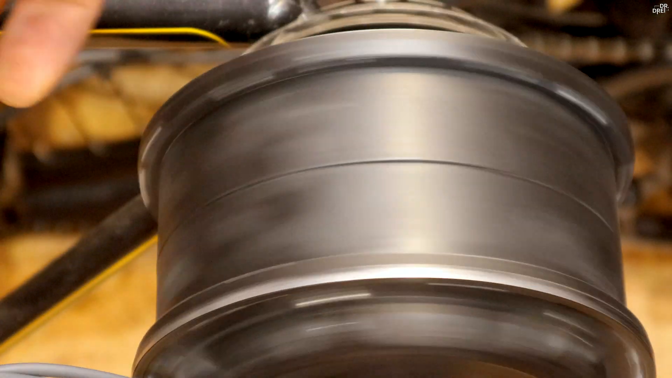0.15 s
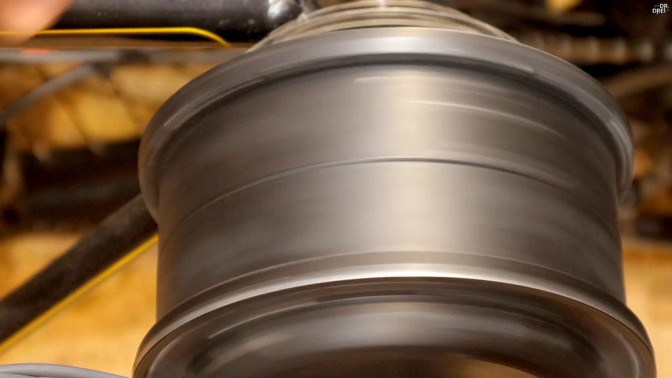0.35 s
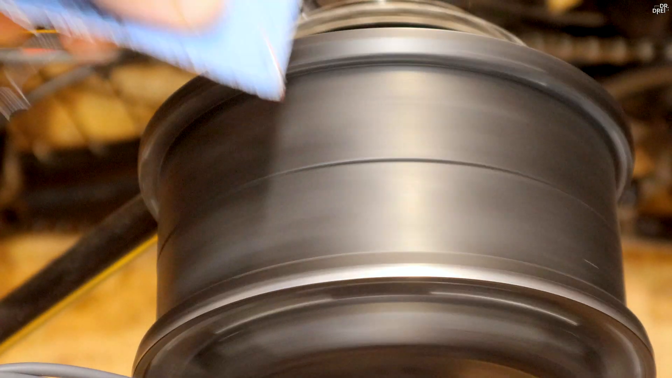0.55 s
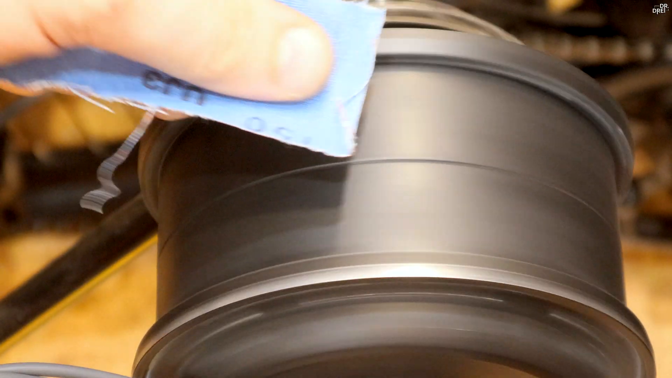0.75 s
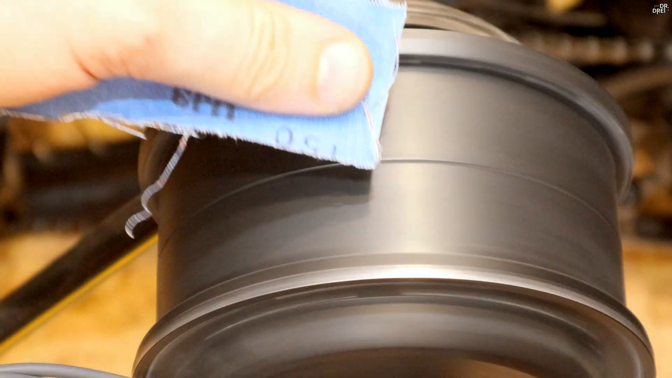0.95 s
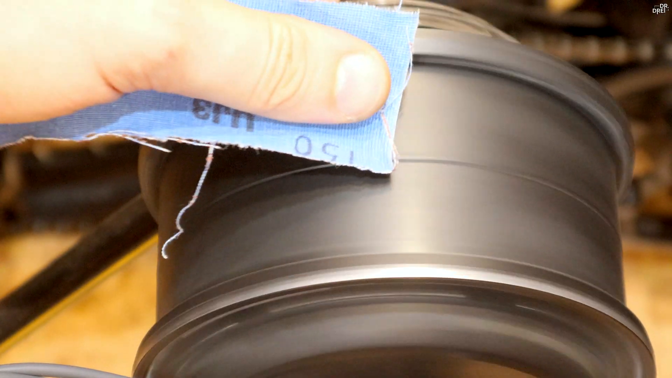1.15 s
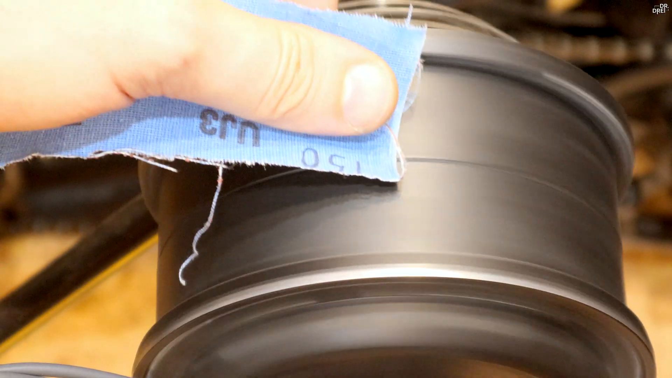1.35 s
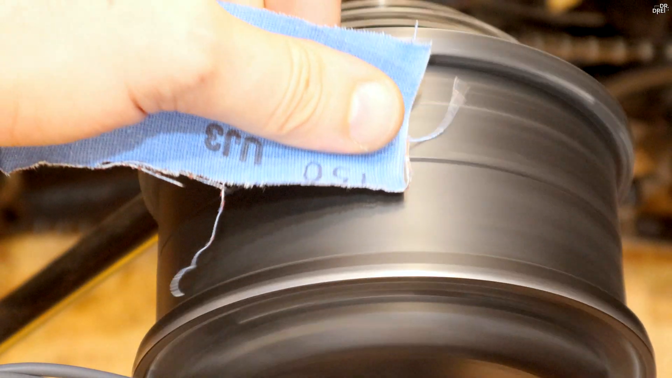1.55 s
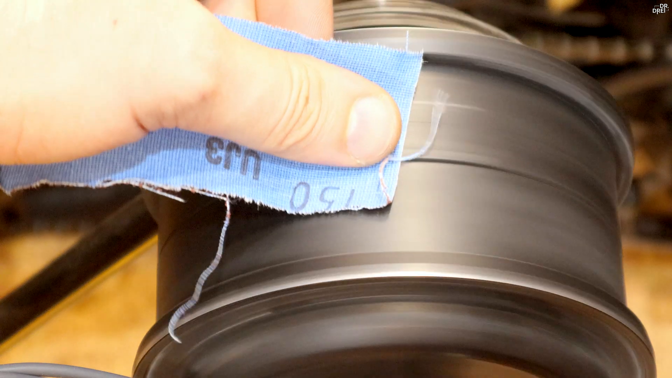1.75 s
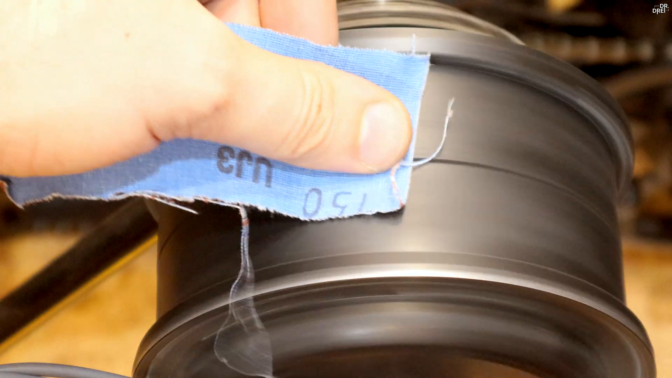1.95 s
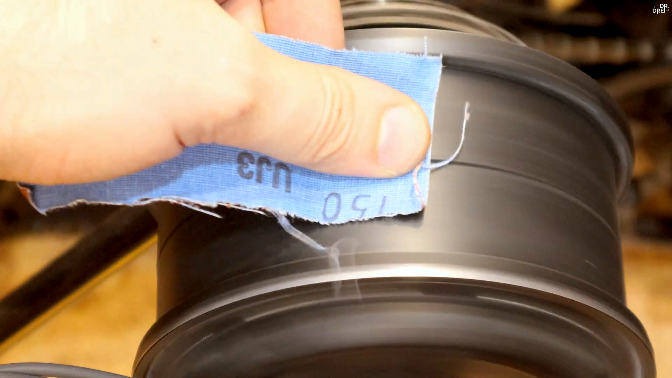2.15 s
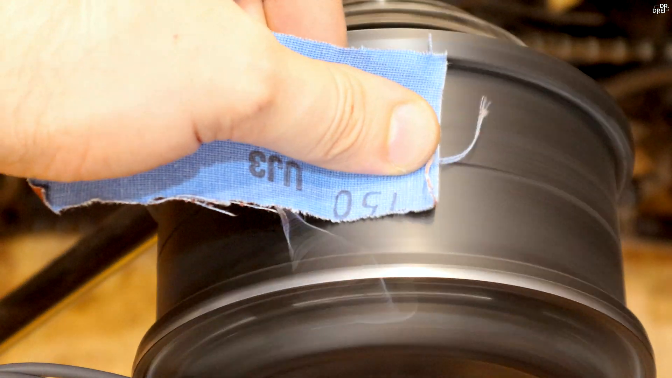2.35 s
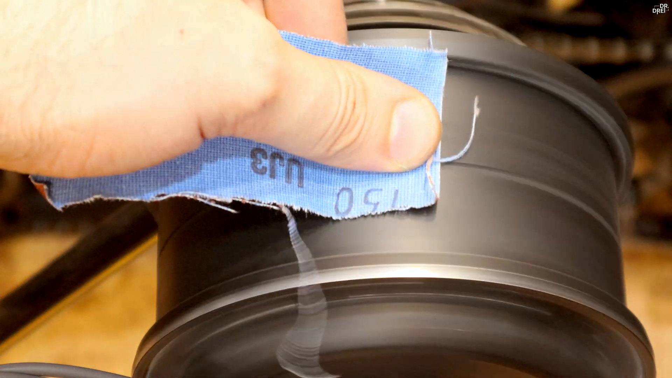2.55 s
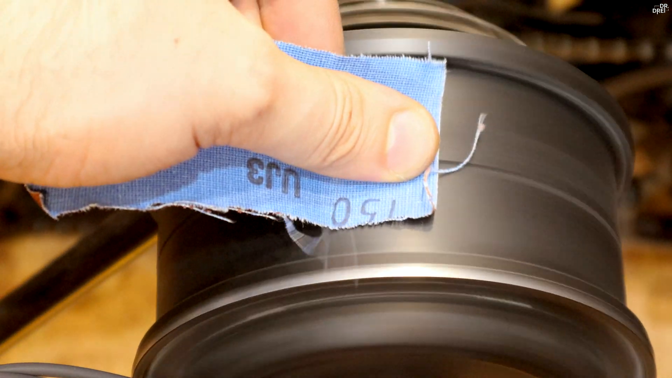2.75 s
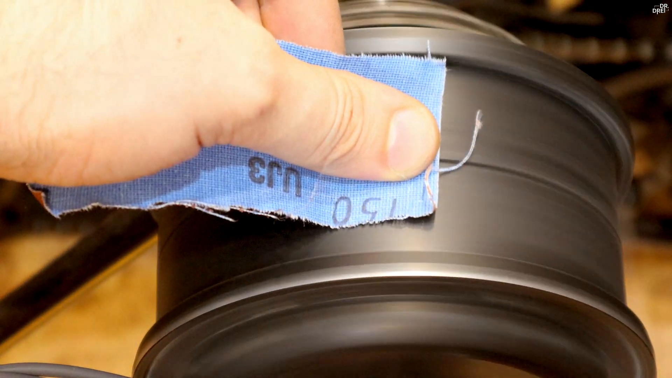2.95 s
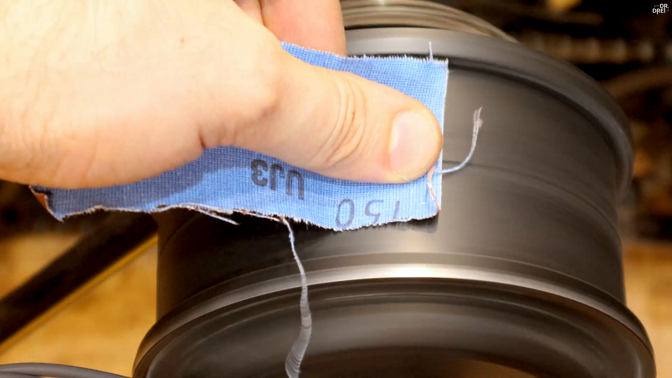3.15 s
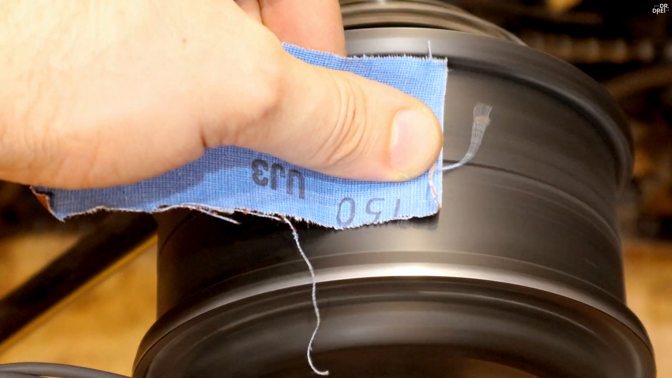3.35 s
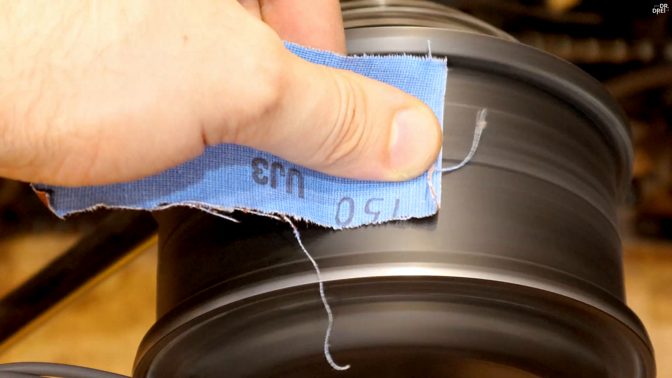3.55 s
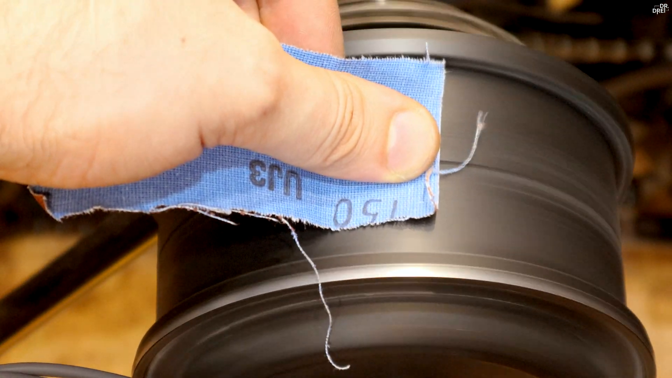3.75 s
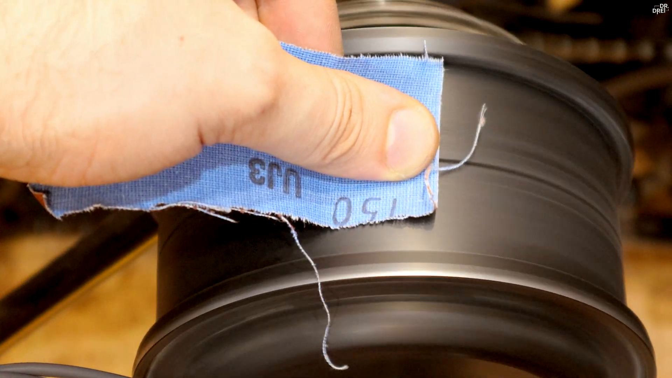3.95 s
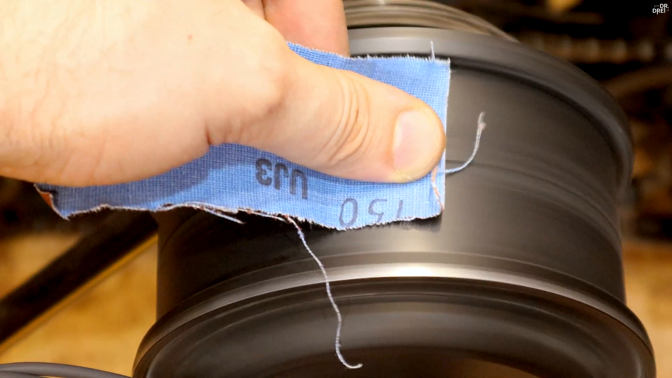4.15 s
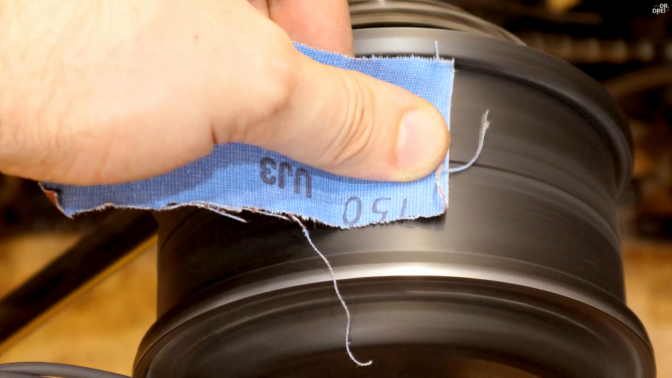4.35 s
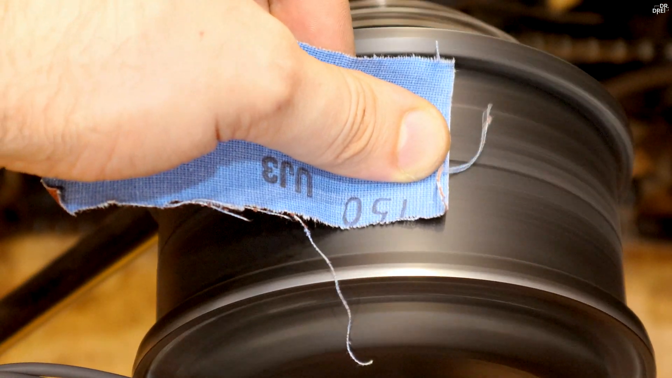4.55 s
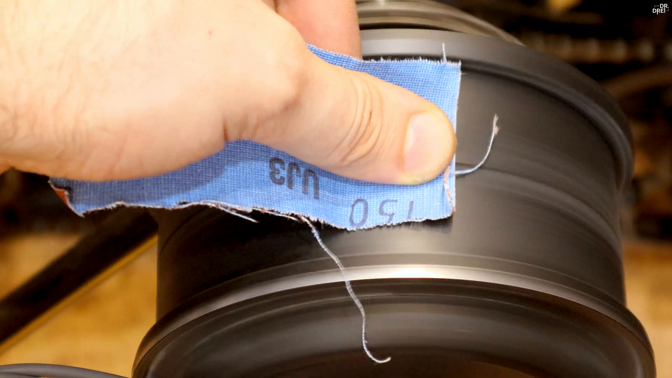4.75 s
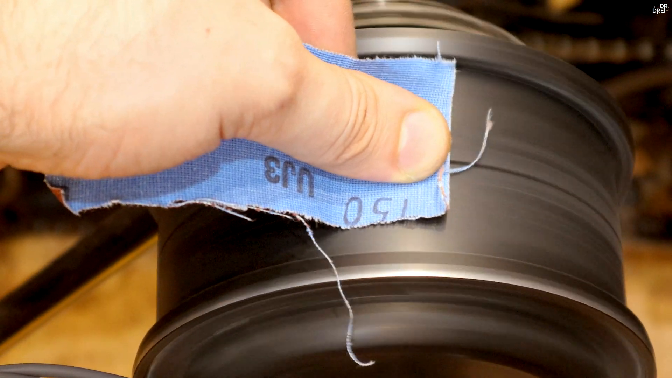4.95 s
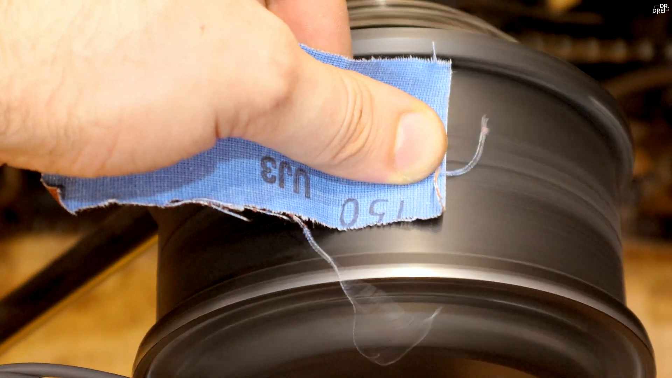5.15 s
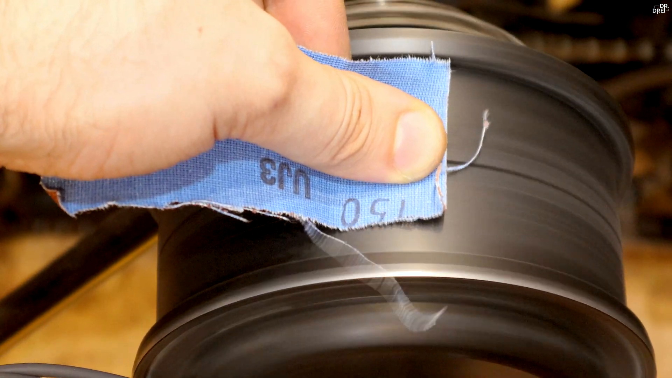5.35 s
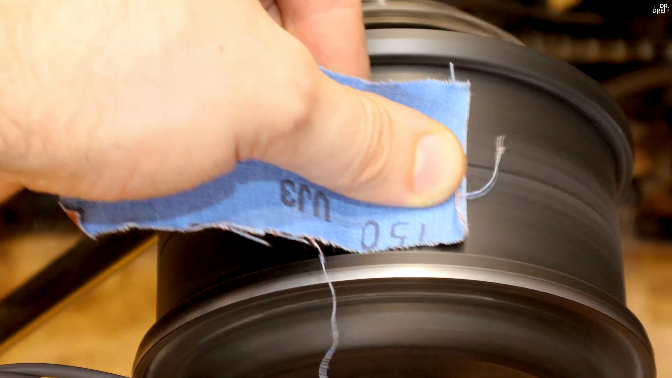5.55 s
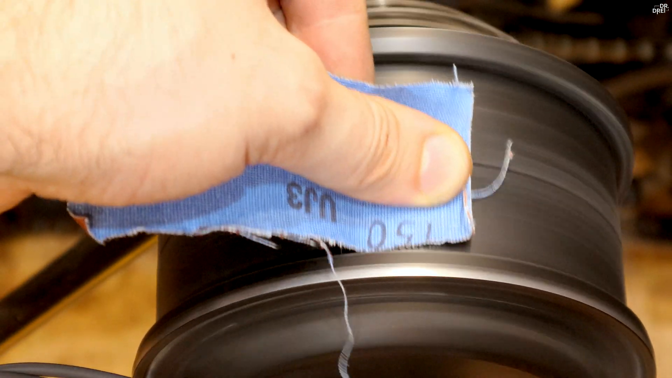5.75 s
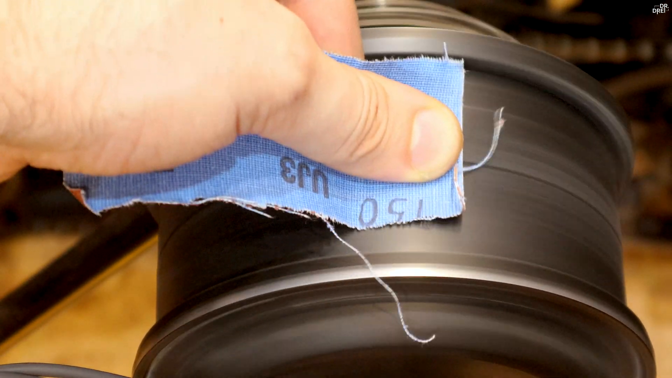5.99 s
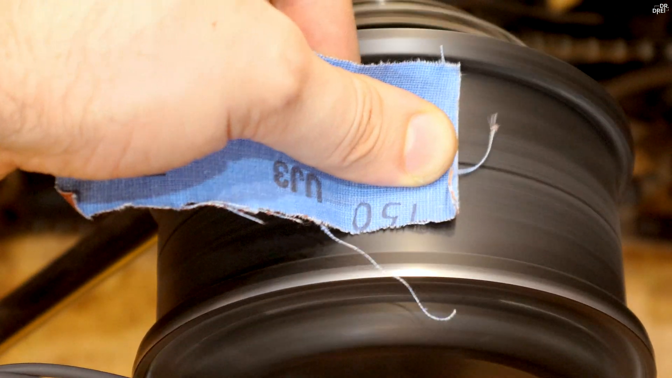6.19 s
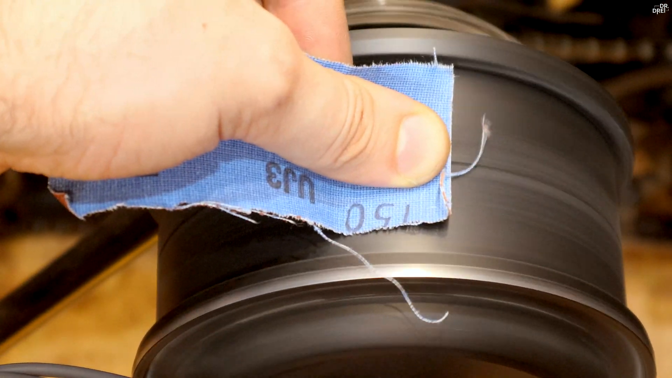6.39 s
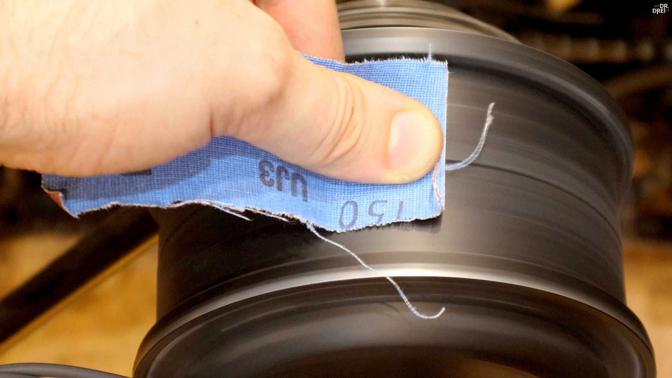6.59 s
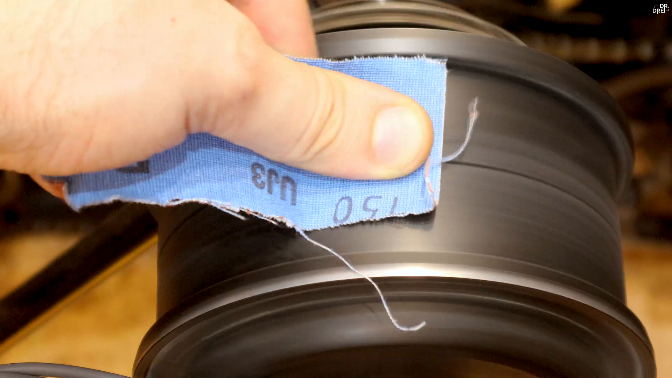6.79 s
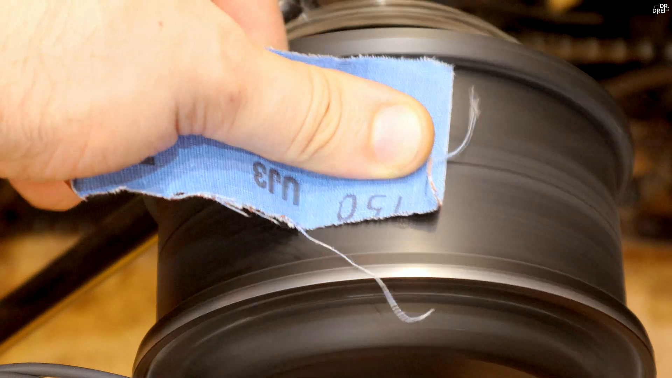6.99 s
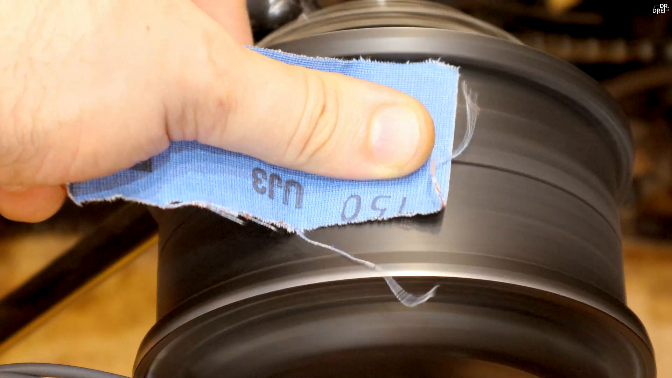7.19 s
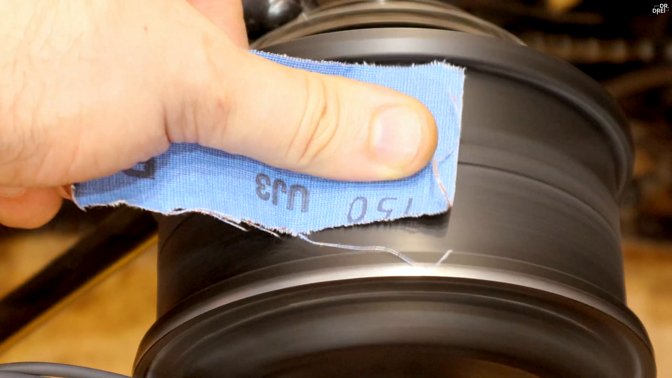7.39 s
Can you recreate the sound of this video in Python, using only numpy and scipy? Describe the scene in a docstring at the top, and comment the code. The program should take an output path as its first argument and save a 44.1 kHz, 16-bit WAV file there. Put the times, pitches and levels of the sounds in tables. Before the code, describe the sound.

A motor hums and knocks softly as it turns, then abrasive cloth presses on its metal shell in a loud, bright, pulsing hiss.

```python
"""On a workshop bench a hub motor turns, its speed rising in steps, and emery cloth is pressed on its metal shell.
Grit hiss is random excitation filtered by shell resonances and modulated by the same rough spots every turn.
The unbalanced rotor is a periodic impulse source: it knocks once a turn and rumbles in the modes of its mount.
Magnet hum, bearing whirr, grain snaps, a brief stick-slip squeal and soft bench bumps join in, over room hush."""
import sys
import numpy as np
from scipy import signal
from scipy.fft import rfft, irfft
from scipy.io import wavfile
from scipy.ndimage import uniform_filter1d

SR = 44100
rng = np.random.default_rng(int(sys.argv[2]) if len(sys.argv) > 2 else 0)


def log_audio(samples):
    """Write samples as a 16-bit WAV file to the path given in sys.argv[1]."""
    # one column per channel
    frames = np.atleast_2d(samples).T
    # limit to full scale, then quantise
    limited = np.clip(frames, -1, 1)
    pcm = np.round(limited * 32767).astype(np.int16)
    wavfile.write(sys.argv[1], SR, pcm)


N = 327222
T = np.arange(N) / SR   # s


def amp(db):
    """Level law: decibels to amplitude ratio."""
    return 10 ** (np.asarray(db) / 20)


def rms_one(x):
    """Normalisation to unit effective value."""
    return x / np.sqrt(np.mean(x ** 2) + 1e-20)


def in_time(rows):
    """Linear interpolation of a table's columns in time."""
    s, *columns = np.transpose(rows)
    return [np.interp(T, s, c) for c in columns]


def bump(s, length):
    """Gaussian envelope, length being its standard deviation."""
    return np.exp(-.5 * ((T - s) / length) ** 2)


def drift(rate):
    """Low-pass random process: noise through a double pole at rate Hz, spread 1."""
    r = np.exp(-2 * np.pi * rate / SR)
    wander = signal.lfilter([1], [1, -2 * r, r * r], rng.standard_normal(N + SR))
    return rms_one(wander[SR:])   # the first second settles the filter


def band_pass(x, order, edges):
    """Butterworth band limitation between two edges in Hz."""
    return signal.sosfilt(signal.butter(order, edges, "band", fs=SR, output="sos"), x)


def colour(x, spectrum, peaks=(), ripple_db=0):
    """Minimum-phase filtering: a spectrum, its resonant rises and a fine ripple of many small modes."""
    hz = np.maximum(np.arange(4097) * SR / 8192, 1)
    spectrum_hz, spectrum_db = np.transpose(spectrum)
    db = np.interp(np.log(hz), np.log(spectrum_hz), spectrum_db)
    for centre, width, rise in peaks:
        db = db + rise / (1 + (2 * (hz - centre) / width) ** 2)
    ripple = rms_one(uniform_filter1d(rng.standard_normal(4097), size=5))
    db = db + ripple_db * np.sqrt(4000 / (hz + 1000)) * ripple
    cepstrum = irfft(db * np.log(10) / 20)
    cepstrum[1:4096] *= 2   # folding the cepstrum gives minimum phase
    cepstrum[4097:] = 0
    response = irfft(np.exp(rfft(cepstrum)))
    return rms_one(signal.oaconvolve(x, response)[..., :N])


def modes(x, table, vary_db=0):
    """Modal superposition: parallel resonances of alternating sign, each driven with a slowly varying strength."""
    out = 0
    for k, (hz, width, db) in enumerate(table):
        r = np.exp(-np.pi * width / SR)
        push = x * amp(vary_db * drift(3.)) if vary_db else x
        poles = [1, -2 * r * np.cos(2 * np.pi * hz / SR), r * r]
        ring = signal.lfilter([1 - r, 0, r - 1], poles, push + 1e-18)
        out = out + (-1) ** k * amp(db) * ring
    return out


def around(place, count):
    """Surface roughness fixed to the rotor: a random profile met again on every turn."""
    return np.interp(place, np.arange(count) / count, rng.standard_normal(count), period=1)


# speed steps: start t/s, lag/s, rotation rate f/(turns per s); the first row is the initial state
SPEED_STEPS = [(0, 1, 4.467), (.62, .17, 4.467), (2.75, .0855, 6.976), (5.25, .05, 8.206)]


def by_step(table):
    """First-order lag: each row of a table is approached exponentially from its speed step on."""
    out = np.array(table[0], float)[:, None] + 0 * T
    for (s, lag, _), old, new in zip(SPEED_STEPS[1:], table, table[1:]):
        approach = 1 - np.exp(-np.maximum(T - s, 0) / lag)
        out = out + np.subtract(new, old)[:, None] * approach
    return out


# spectrum of the room's hush: f/Hz, relative spectral level/dB
ROOM_SPECTRUM = [(13, -45), (22, -22.5), (139, -13), (210, -8), (241, -8.5), (900, -21.5), (3560, -33),
                 (4310, -25), (11300, -32.5), (15700, -25)]
ROOM_DB = -67.5   # dB, rms


def room_hush():
    """Stationary background noise of prescribed spectral density."""
    return amp(ROOM_DB) * colour(rng.standard_normal(N), ROOM_SPECTRUM)


# soft bumps of the bench: t/s, peak level/dB, f/Hz, length/s (two standard deviations)
BENCH_BUMPS = [(.22, -66, 116, 0.015), (1.255, -55, 115, 0.012), (4.424, -67, 40.6, 0.036),
               (6.541, -63, 45.8, 0.029), (6.704, -69, 45, 0.051), (6.816, -58, 44.8, 0.039),
               (6.915, -63, 40, 0.064), (7.151, -54, 53.6, 0.022), (6.848, -66, 69, 0.018),
               (7.102, -68, 78, .02), (7.387, -71, 46, 0.045)]


def bench_bumps():
    """Low-frequency tone bursts under Gaussian envelopes."""
    out = np.zeros(N)
    for s, db, hz, length in BENCH_BUMPS:
        out += amp(db) * np.exp(-2 * ((T - s) / length) ** 2) * np.cos(2 * np.pi * hz * (T - s))
    return out


# cloth rustling: t/s, length/s, level/dB
CLOTH_RUSTLES = [(0.687, 0.018, -65), (5.852, 0.05, -62)]


def cloth_rustle():
    """Friction noise of moving cloth: puffs of mid-band noise."""
    rustle = rms_one(band_pass(rng.standard_normal(N), 2, [1000, 1900]))
    return rustle * sum(amp(db) * bump(s, length) for s, length, db in CLOTH_RUSTLES)


# whirr spectrum: f/Hz, relative spectral level/dB
WHIRR_SPECTRUM = [(880, -20), (1500, -18), (3780, -12), (4010, -11.5), (4290, -5), (5600, -11),
                  (6230, -10.5), (9060, -17.5), (13300, -25.5), (15700, -53)]
# resonances of the free shell in the whirr: f/Hz, width/Hz, rise level/dB
WHIRR_RESONANCES = [(2370, 140, 6), (4200, 220, 6), (5530, 210, 6), (6940, 120, 8), (8510, 280, 4),
                    (10200, 300, 3), (12250, 300, 8)]
# cloth brushing the shell lightly: t/s, length/s, level/dB
LIGHT_BRUSHES = [(0.445, .035, -59.5), (0.678, 0.021, -67), (0.81, 0.033, -62.5)]
WHIRR_LOW_DB, WHIRR_DB = -71.5, -62   # dB, before the rise and once the drive pulls
WHIRR_S, WHIRR_RISE_S = 0.29, 0.27   # s, start and time constant of the rise


def bearing_whirr():
    """Resonant filtering of noise: fine hiss rings in the free shell; brushes add by power."""
    rise = 1 - np.exp(-np.maximum(T - WHIRR_S, 0) / WHIRR_RISE_S)
    steady = amp(WHIRR_LOW_DB + (WHIRR_DB - WHIRR_LOW_DB) * rise)
    brush_power = sum((amp(db) * bump(s, length)) ** 2 for s, length, db in LIGHT_BRUSHES)
    level = np.sqrt(steady ** 2 + brush_power)
    hiss = colour(rng.standard_normal(N), WHIRR_SPECTRUM, WHIRR_RESONANCES, ripple_db=2.0)
    return level * amp(0.93 * drift(33.0)) * hiss


# jolts after each turn's main knock: place/turns, level into mount/dB, level into frame/dB,
# relative to the knock, before the step's bounce strength and a random scatter
ROTOR_BOUNCES = [(0.051, -53, -9), (0.124, -8, -4.5), (.25, -3, -4.5), (0.369, -1, -7), (.47, 4, -8),
                 (0.799, 3, -10), (0.899, -67, -7.5)]
MAGNETS, MAGNET_DB = 46, -55   # passing magnets per turn; tug on the mount in dB relative to the knock


def rotor_jolts(turns, bounce_db):
    """Periodic impulse excitation: one knock a turn, its bounces and rolling noise, into mount and frame."""
    jolts = amp([[-42], [-46]]) * rng.standard_normal((2, N))   # rolling noise between the jolts
    knock = np.flatnonzero(np.diff(np.floor(turns)))
    jolts[:, knock] += amp(1.5 * rng.standard_normal(len(knock)))
    jolts[0] += amp(MAGNET_DB) * np.sin(2 * np.pi * MAGNETS * turns)
    for at, *db in ROTOR_BOUNCES:
        hit = np.flatnonzero(np.diff(np.floor(turns - at)))
        scatter_db = 1.2 * rng.standard_normal(len(hit))
        strength_db = [[.5], [1]] * bounce_db[hit]   # the mount feels half of the change in dB
        jolts[:, hit] += amp(np.reshape(db, (2, 1)) + strength_db + scatter_db)
    return jolts


# modes of the mount: f/Hz, width/Hz, level/dB
MOUNT_MODES = [(175.7, 8.3, -4.5), (209, 16.5, -2), (225, 11, 3), (259.5, 8.8, -5.5), (322.3, 15.7, 0.5),
               (344.8, 12.3, 1.5), (367, 8.7, -0.5), (408.4, 13.3, -2)]
# modes of the frame: f/Hz, width/Hz, level/dB
FRAME_MODES = [(495, 67, -7.5), (625.4, 18.2, -1.5), (682, 16, -1), (714, 10.4, -3), (742.6, 20.3, -6.5),
               (801, 11, -0.5), (852, 14, 0), (951, 33, -4), (1440, 58, -6.5), (1756, 60, -11.5)]
# magnet pull on the stator teeth: cycles per turn, level/dB
POLE_PULL = [(30, -3), (60, -9), (90, 0), (120, -13)]
# the mount rings freely while the heavy side lifts and is damped while it presses down: place/turns, level/dB
HEAVY_SIDE_LIFT = [(0, 0), (.3, 1), (.45, -1), (.55, -14), (.72, -14), (.8, 0), (1, 0)]
# motor in each speed step: rumble level/dB, knock level/dB, hum level/dB, bounce strength/dB, low mount modes/dB
MOTOR_DRIVE = [(-86, -88, -90, -10, -6), (-71.5, -72.5, -73, -14, -12.5), (-66.5, -68.5, -79.5, -3.5, -3.5),
               (-67, -65.5, -72, -1.5, -3.5)]
SURGE_DB = 0.34   # extra rumble in dB per turn/s2 of acceleration


def motor(turns, speed):
    """Forced vibration: jolts shake mount and frame, and the magnets' pull hums where it meets a resonance."""
    rumble_db, knock_db, hum_db, bounce_db, low_db = by_step(MOTOR_DRIVE)
    acceleration = uniform_filter1d(np.gradient(speed) * SR, size=6000)
    rumble_db = rumble_db + SURGE_DB * acceleration
    to_mount, to_frame = rotor_jolts(turns, bounce_db)

    lift_db = np.interp(turns % 1, *np.transpose(HEAVY_SIDE_LIFT))
    rumble = amp(low_db + .4 * lift_db) * modes(to_mount, MOUNT_MODES[:4])   # the low modes are damped less
    rumble = rumble + amp(lift_db) * modes(to_mount, MOUNT_MODES[4:])
    knocks = modes(to_frame, FRAME_MODES, vary_db=2.2)

    pull = 0
    for cycles, db in POLE_PULL:
        pull = pull + amp(db + 2 * drift(6.6)) * np.sin(2 * np.pi * cycles * turns)
    body = MOUNT_MODES + FRAME_MODES
    hum = modes(modes(pull, body), body)   # passed twice for sharper resonance
    return amp(rumble_db) * rms_one(rumble) + amp(knock_db) * rms_one(knocks) + amp(hum_db) * rms_one(hum)


SQUEAL_HZ, SQUEAL_DB, HALF_DB = 2325, -51.5, -12   # mean pitch; mean level; half-rate tones relative to the pitch
SQUEAL_S = 5.797   # s, full level reached
SQUEAL_RISE_S, SQUEAL_HOLD_S, SQUEAL_FALL_S = .008, .055, .014   # rise before it, hold, decay constant


def squeal():
    """Stick-slip oscillation at a wavering rate, every other slip a little stronger: catches, stutters, lets go."""
    since = T - SQUEAL_S
    rise = np.clip(1 + since / SQUEAL_RISE_S, 0, 1)
    fall = np.exp(-np.maximum(since - SQUEAL_HOLD_S, 0) / SQUEAL_FALL_S)
    phase = 2 * np.pi * np.cumsum(SQUEAL_HZ * (1 + .013 * drift(100.))) / SR
    tones = np.sin(phase) + amp(HALF_DB) * (np.sin(phase / 2) + np.sin(3 * phase / 2))
    return rise * fall * amp(SQUEAL_DB + 2.5 * drift(40.)) * rms_one(tones)


# single grains tearing loose: t/s, level/dB of the burst's start before the band-pass
GRAIN_SNAPS = [(1.3307, -26), (1.4105, -32), (1.5527, -24), (1.634, -31), (1.687, -25), (1.73, -22),
               (1.853, -21), (1.871, -29), (1.994, -27), (2.219, -30), (2.4435, -24), (4.16, -22),
               (5.3446, -25), (5.8037, -17), (5.8085, -18), (5.827, -26), (5.8504, -28), (7.013, -22),
               (7.1317, -24), (7.1754, -22), (7.2543, -20), (7.375, -18)]


def grain_snaps():
    """Impulsive release: each snap is a bright noise burst of 1 ms decay constant."""
    clicks = np.zeros(N)
    for s, db in GRAIN_SNAPS:
        clicks[round(s * SR)] = amp(db)
    decay = signal.lfilter([1], [1, -np.exp(-1 / (.001 * SR))], clicks + 1e-18)
    return band_pass(rng.standard_normal(N) * decay, 3, [6000, 11000])


# cloth sliding on the shell, adding a coarser rasp: t/s, length/s, level/dB, centre f/Hz
CLOTH_SLIDES = [(1.732, 0.072, -53, 3100), (1.826, .03, -64, 2020), (1.86, 0.071, -47, 6100),
                (2.23, 0.015, -59, 3000), (5.513, 0.33, -56.5, 3600), (5.69, .06, -47, 5770),
                (5.81, 0.031, -40, 5840), (5.816, 0.034, -48, 3100), (5.84, 0.042, -60, 2000),
                (6.953, .12, -51.5, 5500)]
SLIDE_OCTAVES = 0.26   # half-width of the rasp's band


def slide_rasp(texture_db):
    """Sliding friction: noise modulated by the surface texture, heard in a narrow band."""
    rasp = rng.standard_normal(N) * amp(2.0 * drift(42.0) + texture_db)
    out = 0
    for s, length, db, hz in CLOTH_SLIDES:
        edges = hz * 2 ** (SLIDE_OCTAVES * np.array([-1, 1]))
        out = out + amp(db) * bump(s, length) * rms_one(band_pass(rasp, 2, edges))
    return out


# spectrum of the grit hiss: f/Hz, relative spectral level/dB
HISS_SPECTRUM = [(710, -11.5), (1200, -32), (1430, -36.5), (2080, -27.5), (2750, -26.5), (3230, -24),
                 (3670, -15.5), (4860, -15.5), (6290, -6), (6930, -4.5), (8230, -4), (10100, 2.5),
                 (12000, -8), (13100, -8.5), (15700, -10.5)]
# shell resonances standing out of or dipping into the hiss: f/Hz, width/Hz, rise level/dB
SHELL_RESONANCES = [(2060, 88, -11), (2785, 170, 7), (3072, 22, 7.5), (3120, 120, 4), (3670, 420, 5.5),
                    (3735, 50, -5.5), (4370, 110, 2), (4232, 41, 8.5), (5470, 110, 4), (5470, 83, 2),
                    (6750, 82, -9), (7970, 86, 7), (8430, 450, 5.5), (11020, 330, -4), (12700, 360, 4.5),
                    (14150, 400, -2)]


def grit_hiss():
    """Shot noise in a resonator: dense scratches and smooth noise filtered by the shell."""
    grain_db = 1.8 * np.minimum(rng.exponential(1, N), 5)
    grains = (rng.random(N) < 2500 / SR) * amp(grain_db) * rng.choice([-1, 1], N)   # 2500 grains/s on average
    scratches = 0.48 * rng.standard_normal(N) + 0.35 * rms_one(grains)
    return colour(scratches, HISS_SPECTRUM, SHELL_RESONANCES, ripple_db=2.5)


# rough and worn spots around the shell: place/turns, width/turns, level in bright zones/dB, level in dull zones/dB,
# both before scaling by the hand
SHELL_SPOTS = [(.15, 0.085, 2, 1.4), (.55, 0.013, -5.5, -1), (0.637, 0.026, 6.5, 4),
               (.87, 0.095, -2.5, 0.2), (.92, .015, 5.5, 3), (.04, 0.038, 0, 0.4)]
# hand on the cloth: t/s, hiss level near 8 kHz/dB, band near 10 kHz relative to it/dB, factor on the spots' depth;
# each zone takes its own share of the two levels
HAND_PRESSURE = [(1.34, -49, -7, 1.9), (1.5, -44, -10, 0.48), (1.75, -43, 0.5, 0.83),
                 (1.95, -41, -11, 0.57), (2.2, -41, 0.5, 0.6), (2.4, -43.5, 5.5, .8), (2.62, -41, 0.5, .8),
                 (2.7, -44, 0, 0.63), (2.8, -40.5, -1, 1.4), (3.15, -41, 5.5, .9), (3.6, -40, 0, 0.88),
                 (4.1, -41.5, 3.5, 0.72), (4.5, -40, -1.5, 0.63), (5.25, -40.5, 0.5, 0.75),
                 (5.8, -38.5, .5, .55), (6, -39.5, -4, 0.52), (6.4, -41, -0.5, 0.83), (6.85, -39.5, -4, .6),
                 (7.1, -38.5, -8.5, 1.35), (7.3, -37.5, -0.5, 0.99), (7.42, -37.5, -2, 0.72)]
# zones of the hiss: low f/Hz, high f/Hz
HISS_ZONES = [(1200, 3200), (3200, 5000), (5000, 7500), (7500, 9300), (9300, 11500), (11500, 17000)]
# each zone: level at full pressure/dB, share of the hand's swing, share of the 10 kHz swing,
# level missing at first touch/dB
ZONE_RESPONSE = [(-59, 0.74, .0, 1.5), (-54, 0.82, 0.38, 0), (-46.5, 1.37, 0.23, -7),
                 (-42, 1.77, 0.088, -4.5), (-43.5, 1.35, 1.3, .1), (-45, 1.3, .2, 12)]
FULL_DB = -40.5   # hand level at full pressure
TOUCH_S, BED_IN_S = 1.33, 0.18   # s, first touch; time constant for the grit to bed in


def sanding(place):
    """Amplitude modulation by rotation: hiss shaped by shell spots, in zones that answer the hand differently."""
    hand_db, top_db, grip = in_time(HAND_PRESSURE)
    hiss = grit_hiss()
    texture_db, flutter_db = 0.83 * around(place, count=70), 0.66 * drift(28.0)
    fresh = np.exp(-np.maximum(T - TOUCH_S, 0) / BED_IN_S)
    out = slide_rasp(texture_db)
    for k, ((low, high), response) in enumerate(zip(HISS_ZONES, ZONE_RESPONSE)):
        db, follows, top, missing_db = response
        spots_db = 0
        for at, width, bright_db, dull_db in SHELL_SPOTS:
            distance = (place - at + .5) % 1 - .5   # shortest way round, in turns
            depth_db = dull_db if low < 7000 else bright_db
            spots_db = spots_db + depth_db * np.exp(-.5 * (distance / width) ** 2)
        zone_drift_db = 0.74 * drift(24.8) + 0.63 * drift(4.1)
        gain = amp(grip * spots_db + texture_db + flutter_db + zone_drift_db)
        zone = band_pass(hiss, 3, [low, high])
        level_db = db + follows * (hand_db - FULL_DB) + top * top_db - missing_db * fresh
        out = out + (-1) ** k * amp(level_db) * rms_one(gain * zone)
    return out * np.clip((T - TOUCH_S) / 0.00084, 0, 1)


KNOCK_S = .989   # s, one knock; the rest follow from the speed
CLOTH_LEAD_S, CLOTH_TURNS = .0065, .086   # s and turns by which the cloth meets the spots ahead of the knock


def scene():
    """Linear superposition of all sources close to one microphone, over the room's hush."""
    speed = by_step(SPEED_STEPS)[2]
    turns = np.cumsum(speed) / SR - KNOCK_S * speed[0]
    place = (np.interp(T + CLOTH_LEAD_S, T, turns) + CLOTH_TURNS) % 1
    background = room_hush() + bench_bumps() + cloth_rustle()
    machine = bearing_whirr() + motor(turns, speed)
    cloth = squeal() + grain_snaps() + sanding(place)
    return (background + machine + cloth)[None]


def record(dry):
    """Band limitation: a steep low-pass with 70 dB rejection from 15920 Hz up."""
    return signal.sosfilt(signal.cheby2(24, 70, 15920, fs=SR, output="sos"), dry)


dry = scene()
out = record(dry)
log_audio(out)
```